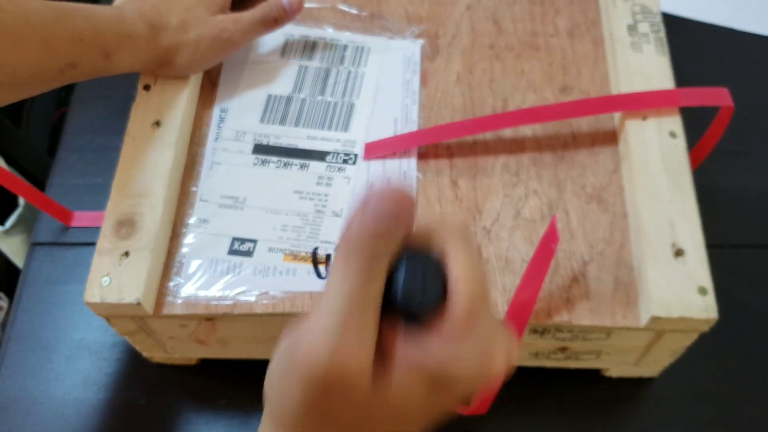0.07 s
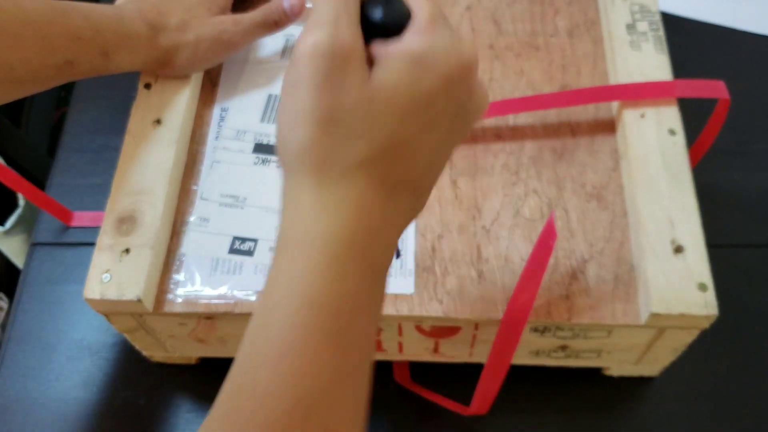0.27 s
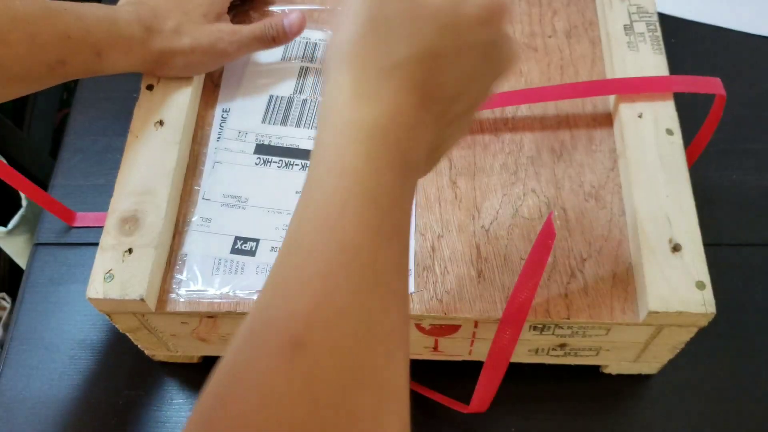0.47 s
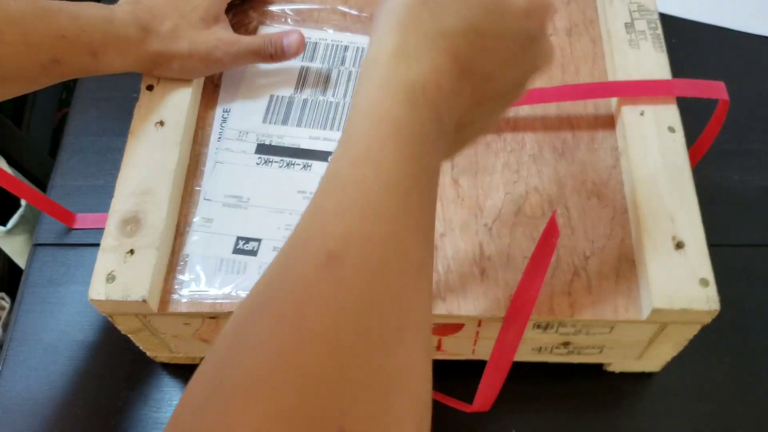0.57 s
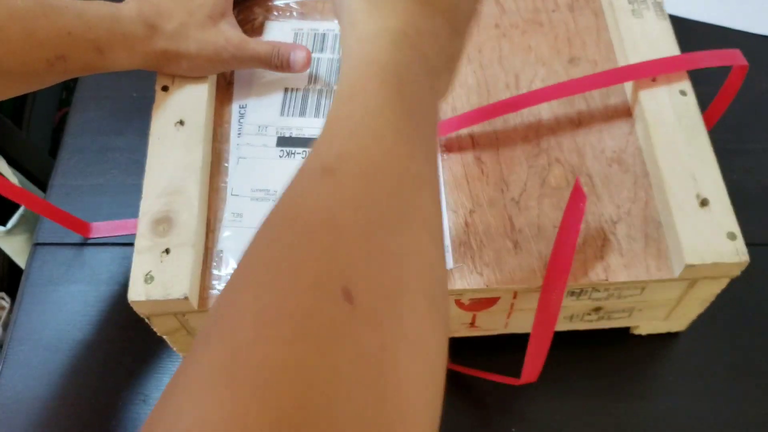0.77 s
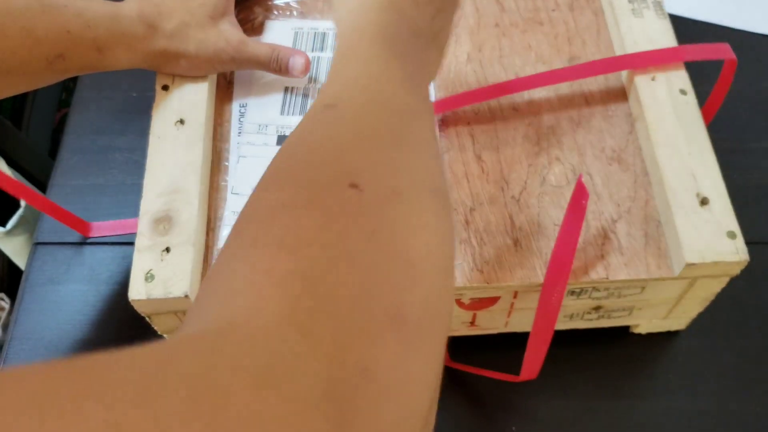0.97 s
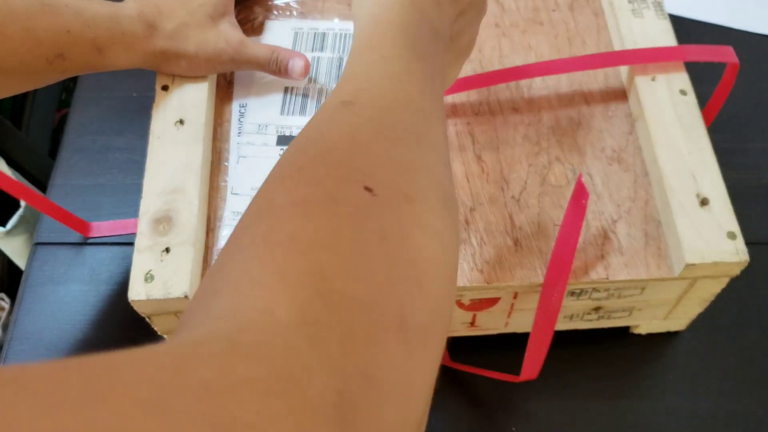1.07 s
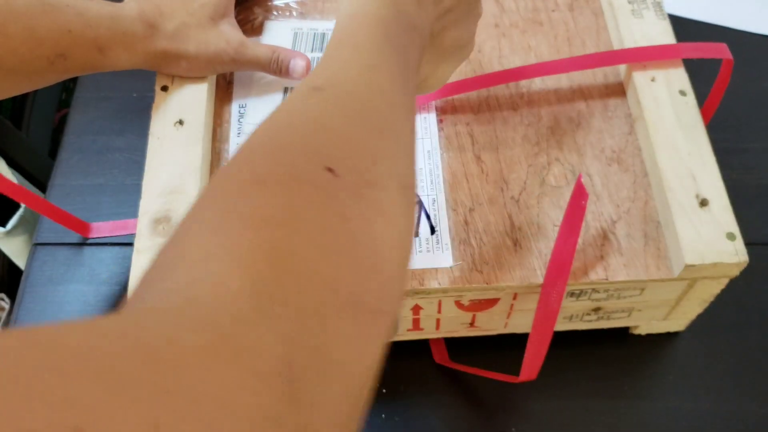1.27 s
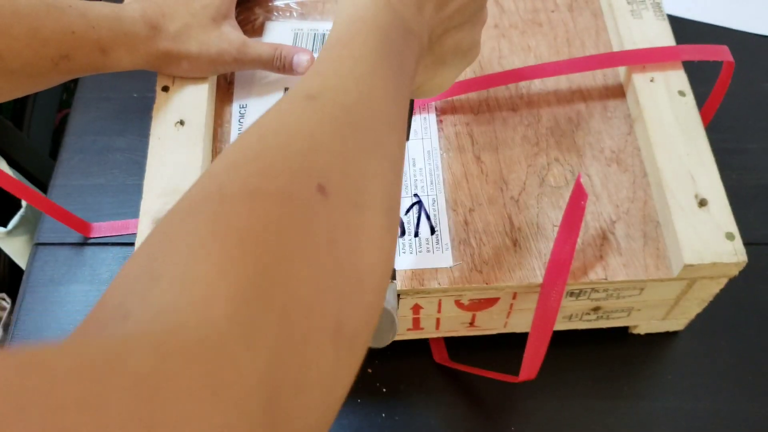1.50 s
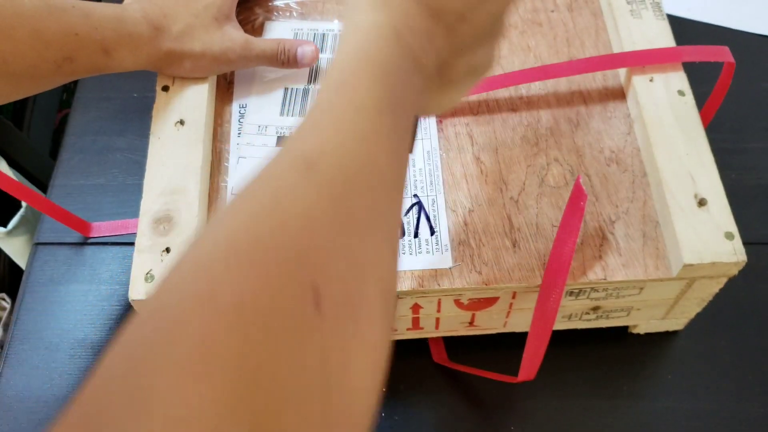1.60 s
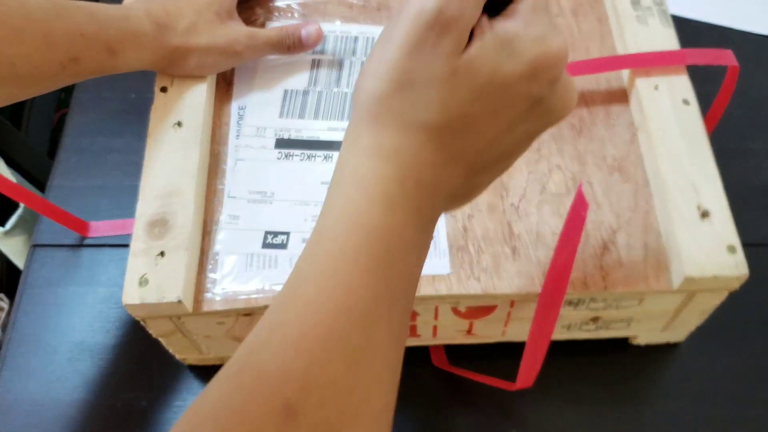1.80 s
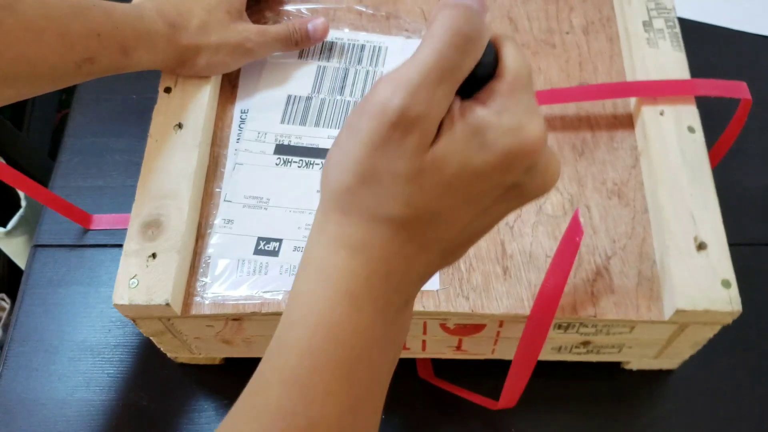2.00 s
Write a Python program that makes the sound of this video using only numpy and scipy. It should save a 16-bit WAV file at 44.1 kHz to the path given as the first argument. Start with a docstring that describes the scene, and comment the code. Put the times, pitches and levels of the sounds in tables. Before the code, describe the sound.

A taut plastic strap snaps under a knife with a loud crack and a hollow wooden thud. Two softer bumps on the crate follow, among faint scrapes, taps and rustles, heard close by in a small room.

```python
"""Cutting a strap on a crate

A knife parts a taut plastic strap with a crack, close by in a small room. The release jolts the
plywood crate on its table and excites its normal modes. Hand and tool bump the lid twice more,
among light taps and the friction sounds of scrapes, creaks, squeals and the rustling loose strap."""
import sys
import numpy as np
from scipy import signal
from scipy.fft import rfft, irfft, next_fast_len
from scipy.io import wavfile
from scipy.ndimage import uniform_filter1d

SR = 44100
rng = np.random.default_rng(int(sys.argv[2]) if len(sys.argv) > 2 else 0)


def transcribe(signal):
    """Save signal, clipped to [-1, 1], as a 16-bit WAV file at the path in sys.argv[1]."""
    frames = np.atleast_2d(signal).T
    limited = np.clip(frames, -1, 1)
    pcm = np.round(limited * 32767).astype(np.int16)
    wavfile.write(sys.argv[1], SR, pcm)


N = 90404


def amp(db):
    """Amplitude ratio of a level in decibels."""
    return 10 ** (np.asarray(db) / 20)


def decay(t, t60):
    """Exponential damping: the level falls 60 dB in t60 seconds."""
    return np.exp(-np.log(1000) * t / t60)


def curve_at(points, hz):
    """Interpolation on a logarithmic frequency axis."""
    f, value = np.transpose(points)
    return np.interp(np.log(hz + 1), np.log(f + 1), value)


def colour(x, spectrum, tilt_db=0):
    """Minimum-phase filtering by a spectrum, tilted by tilt_db per octave about 4 kHz."""
    size = next_fast_len(x.shape[1] // 2 + 2048) * 2
    hz = np.fft.rfftfreq(size, 1 / SR)
    octaves = np.log2(np.maximum(hz, 500) / 4000)
    cepstrum = irfft(np.log(amp(curve_at(spectrum, hz) + tilt_db * octaves)))
    cepstrum[1:size // 2] *= 2  # folding the cepstrum makes the filter causal
    cepstrum[size // 2 + 1:] = 0
    return irfft(rfft(x, size) * np.exp(rfft(cepstrum)))[:, :x.shape[1]]


# Left-right coherence of the sound field: f/Hz, correlation
COHERENCE = [(160, .99), (330, 0.92), (1100, 0.044)]
def cohere(x):
    """Spatial coherence: long waves reach two nearby points alike, short waves do not."""
    a, b = rfft(x)
    correlation = curve_at(COHERENCE, np.fft.rfftfreq(x.shape[1], 1 / SR))
    mid = a * np.sqrt((1 + correlation) / 2)
    side = b * np.sqrt((1 - correlation) / 2)
    return irfft(np.array([mid + side, mid - side]), x.shape[1])


def noise(size):
    """Stereo white noise, coherent in the bass."""
    return cohere(rng.standard_normal((2, size)))


# Spectrum of the room's background: f/Hz, level/dB
AIR_SPECTRUM = [(20, -12.5), (60, -13.5), (92, 0), (140, -8.5), (500, -23), (2000, -37), (5200, -35.5),
                (15000, -47.5)]
def room_tone():
    """Stationary noise, strongest in the bass, lies under the scene."""
    air = colour(noise(N), AIR_SPECTRUM)
    return amp(-55) * air / air.std()


# Spectra of bright contact noise and of the boards' dull clatter: f/Hz, level/dB
CONTACT_SPECTRUM = [(100, -4.5), (500, 2), (1050, 2), (1350, -3), (1750, 0.5), (2800, -3), (3600, -0.5),
                    (7500, -5), (9200, -11), (14000, -8), (16000, -25)]
BOARD_SPECTRUM = [(30, -28), (70, -16.5), (150, 2.5), (350, 6.5), (700, -2.5), (1200, -9), (16000, -100)]
# Scrapes over the lid: t/s, duration/s, hiss level/dB, rumble level/dB, hiss tilt/(dB/octave)
SCRAPE_STROKES = [(0, 0.038, -47.5, -49.5, -3), (0.168, 0.016, -53.5, -55, -6),
                  (0.577, 0.19, -56.5, -41, 0), (0.624, 0.033, -49, -40, -4), (0.708, 0.18, -51, -56, 0),
                  (0.828, 0.14, -58, -57, -3.5), (1.042, 0.12, -58.5, -40, -1),
                  (1.112, 0.05, -45.5, -30.5, 1.5), (1.406, 0.1, -55, -40, 0.5),
                  (1.61, 0.12, -63, -44.5, -0.5), (1.761, 0.099, -49.5, -61, 0), (1.834, 0.12, -51, -34, 5),
                  (1.918, 0.16, -49, -48, -2)]
def scrape(length, hiss_db, rumble_db, tilt_db, slips_per_s=2400, spread_db=3):
    """Sliding friction: dense random slips hiss at the contact and rumble in the lid."""
    t = np.arange(SR // 3) / SR
    swell, fade = t / (0.12 * length), (length - t) / (0.5 * length)
    stroke = np.clip(np.minimum(swell, fade), 0, 1)
    slips = (rng.random((2, len(t))) < slips_per_s / SR) * rng.choice([-1, 1], (2, len(t)))
    slips = slips * amp(spread_db * np.minimum(rng.exponential(1, slips.shape), 4))
    friction = cohere(slips / slips.std()) * stroke
    hiss = amp(hiss_db) * colour(friction, CONTACT_SPECTRUM, tilt_db)
    return hiss + amp(rumble_db) * colour(friction, BOARD_SPECTRUM)


# Modes of the blade: f/Hz, level/dB
BLADE_MODES = [(1755, -21.5), (2420, -21.5), (3550, -16), (4780, -15.5), (6280, -15)]
# Cracks and ticks of strap and blade: t/s, level/dB, time constant/s, tilt/(dB/octave)
STRAP_CRACKS = [(0.0414, -36.5, 0.002, 8.5), (0.2209, -32, 0.007, -8), (0.2352, -19.5, 0.0043, -4.5),
                (.2528, -5.5, 0.0028, -1), (0.269, -16, 0.0024, -4), (1.1155, -43.5, 0.0076, 1),
                (1.4253, -42, 0.0024, 4), (1.844, -38.5, 0.01, -0.5), (1.8869, -32.5, 0.004, 0),
                (1.9943, -47, 0.0016, 12), (2.0243, -39.5, 0.0022, 5)]
def crack(level_db, decay_s, tilt_db):
    """Fracture: tearing plastic emits a broadband transient that sets the blade ringing."""
    t = np.arange(SR // 8) / SR
    rise_s = 0.45 * decay_s
    envelope = np.minimum(t / rise_s, 1) ** 2 * np.exp(-np.maximum(t - rise_s, 0) / decay_s)
    burst = noise(len(t)) * envelope
    blade = sum(amp(db) * np.cos(2 * np.pi * hz * t) for hz, db in BLADE_MODES) * decay(t, t60=0.016)
    ring = signal.fftconvolve(burst, blade[None] / 10, axes=1)[:, :len(t)]
    return amp(level_db) * colour(burst + ring, CONTACT_SPECTRUM, tilt_db)


# Modes of the crate: f/Hz, T60/s, level/dB when excited at the strap, at the far edge, on the lid
CRATE_MODES = [(122, 0.24, -23, -66, -34.5), (154.7, 0.33, -20.5, -30.5, -32.5),
               (180, 0.32, -20.5, -33.5, -58), (204.8, 0.65, -31.5, -66.5, -39.5),
               (223.7, 0.084, -6.5, -43.5, -28), (281.5, 0.19, -15, -35.5, -47.5),
               (322.6, 0.36, -18.5, -34, -67), (374, 0.36, -15.5, -43, -61), (457.5, 0.33, -22, -52.5, -48),
               (519, 0.23, -26, -47, -52.5), (629, 0.29, -28.5, -42.5, -70), (686.5, 0.13, -21, -52, -47),
               (754.4, 0.13, -27, -63, -57), (1013, 0.13, -36.5, -67, -83)]
# Blows: t/s, ring level/dB, rise/s, clatter level/dB, place (0 strap, 1 far edge, 2 lid)
CRATE_BLOWS = [(.168, -11.5, 0.015, -56, 1), (0.2225, -1.5, 0.0046, -25.5, 0),
               (0.2393, 5, 0.0027, -10.5, 0), (0.2583, -6.5, 0.0018, -22, 0), (0.723, 0.5, 0.0038, -25, 1),
               (0.7614, -3, 0.0045, -40, 1), (1.049, -19, 0.0017, -34, 2), (1.375, -9.5, 0.0038, -42.5, 2),
               (1.7704, 0.5, 0.0014, -36.5, 2), (1.7935, -7.5, 0.0023, -34, 2)]
def blow(ring_db, rise_s, clatter_db, place, punch_s=0.04, rock_s=0.012, clatter_s=0.012):
    """Free vibration: the crate's damped modes waver as it rocks, over a brief clatter of boards."""
    t = np.arange(SR // 2) / SR
    ring = np.zeros((2, len(t)))
    for hz, t60, *levels_db in CRATE_MODES:
        stereo_phase = np.tanh((hz / 440) ** 2) * np.array([[0.5], [-0.5]])
        rocking = uniform_filter1d(rng.standard_normal(len(t)), round(rock_s * SR))
        detune = 0.017 * rocking / rocking.std() * np.minimum(t / punch_s, 1)
        cycles = hz * np.cumsum(1 + detune) / SR
        ring -= amp(levels_db[place]) * decay(t, t60) * np.sin(2 * np.pi * cycles + stereo_phase)
    ring *= amp(ring_db) * (1 + 0.5 * np.exp(-t / punch_s))  # the first cycles swing wider
    swell = 1 - np.exp(-(t / rise_s) ** 2)
    bass_cut = signal.butter(2, 81, "highpass", fs=SR, output="sos")  # the ring is thin below about 80 Hz
    clatter = colour(noise(len(t)) * swell * np.exp(-t / clatter_s), BOARD_SPECTRUM)
    return signal.sosfilt(bass_cut, ring * swell) + amp(clatter_db) * clatter


# Harmonics of a creak, from the fundamental up: level/dB
CREAK_HARMONICS = [-13, -4, -14, -20.5, -23, -39, -34.5]
# Creaks of the tool on the wood: t/s, duration/s, slip rate f/Hz, level/dB
TOOL_CREAKS = [(0.573, 0.075, 129, -41), (0.712, 0.029, 168.6, -17), (0.867, 0.078, 105, -44.5)]
def creak(length, slip_hz, level_db):
    """Stick-slip oscillation: a few evenly spaced slips make a short, hollow harmonic note."""
    t = np.arange(0, length, 1 / SR)
    note = sum(amp(db) * np.sin(2 * np.pi * (k * slip_hz * t + rng.random()))
               for k, db in enumerate(CREAK_HARMONICS, 1))
    return np.tile(amp(level_db) * note * np.sin(np.pi * t / length), (2, 1))


# Squeals of the rubbed blade and strap: t/s, duration/s, f/Hz, level/dB
BLADE_SQUEALS = [(1.114, 0.023, 4220, -48.5), (1.785, 0.012, 4520, -55)]
def squeal(length, hz, level_db, bandwidth_hz=360):
    """Resonance: friction noise drives one narrow mode of the blade."""
    t = np.arange(SR // 8) / SR
    mode = np.exp(-np.pi * bandwidth_hz * t) * np.cos(2 * np.pi * hz * t)
    whistle = irfft(rfft(noise(len(t))) * rfft(mode), len(t))
    return amp(level_db) * whistle / whistle.std() * np.sin(np.pi * np.minimum(t / length, 1))


# Modes of the tapped wood: frequency ratio, level/dB
WOOD_MODES = [(0.641, -3), (1.002, 3), (1.33, -5), (2.6, -14.5)]
# Light taps of the tool: t/s, f/Hz, level/dB
TOOL_TAPS = [(1.129, 912, -41.5), (1.383, 640, -41), (1.458, 910, -47), (1.597, 910, -42.5),
             (1.622, 693, -41)]
def tap(hz, level_db, contact_s=0.0013):
    """Impact excitation: a tiny tick and a short ring whose pitch depends on the spot touched."""
    t = np.arange(SR // 8) / SR
    contact = np.exp(-t / contact_s)
    modes = sum(amp(db) * np.sin(2 * np.pi * ratio * hz * t) for ratio, db in WOOD_MODES)
    ring = modes * decay(t, t60=0.025) * (1 - contact)
    tick = amp(-2.5) * colour(noise(len(t)) * contact, CONTACT_SPECTRUM)
    return amp(level_db) * (ring + tick)


# Spectrum of the room's diffuse tail: f/Hz, level/dB
TAIL_SPECTRUM = [(200, -11.5), (550, -4.5), (1300, -0.5), (14000, -5.5)]
def reverberation(direct, t60=0.32, build_s=0.006):
    """Diffuse field: dense reflections, weak in the bass, build up and decay exponentially."""
    t = np.arange(SR) / SR
    unit_energy_gain = np.sqrt(2 * np.log(1000) / (t60 * SR))
    envelope = unit_energy_gain * decay(t, t60) * np.minimum(t / build_s, 1) ** 2
    tail = colour(noise(SR), TAIL_SPECTRUM) * envelope
    return signal.fftconvolve(direct, tail, axes=1)[:, :N]


def scene():
    """Superposition: the direct sounds, the room tone and the reverberation add."""
    direct = np.zeros((2, N))
    for source, events in [(blow, CRATE_BLOWS), (crack, STRAP_CRACKS), (tap, TOOL_TAPS),
                           (scrape, SCRAPE_STROKES), (creak, TOOL_CREAKS), (squeal, BLADE_SQUEALS)]:
        for start_s, *settings in events:
            start = round(start_s * SR)
            sound = source(*settings)[:, :N - start]
            direct[:, start:start + sound.shape[1]] += sound
    return direct + room_tone() + reverberation(direct)


def record(dry, cutoff_hz=15700):
    """Soft saturation rounds peaks near full scale; a low-pass filter then limits the band."""
    rounded = dry / (1 + dry ** 8) ** (1 / 8)
    lowpass = signal.firwin(255, cutoff_hz, window=("kaiser", 9), fs=SR)
    return signal.oaconvolve(rounded, lowpass[None], "same")


dry = scene()
out = record(dry)
transcribe(out)
```